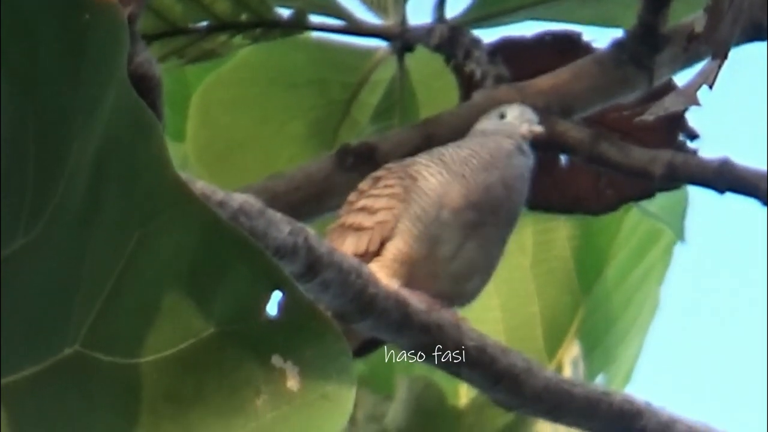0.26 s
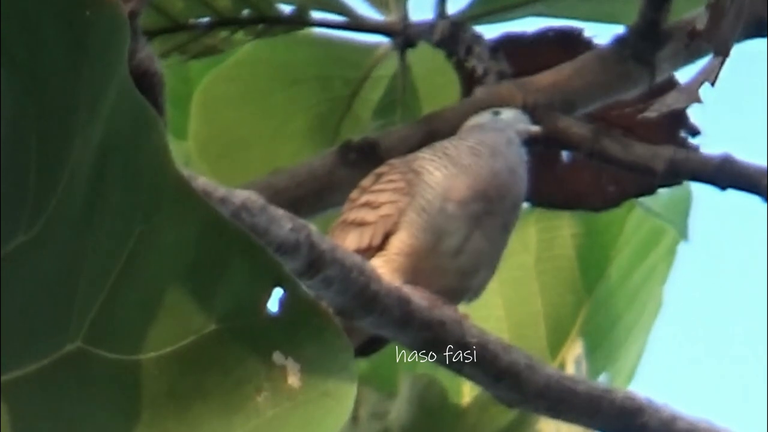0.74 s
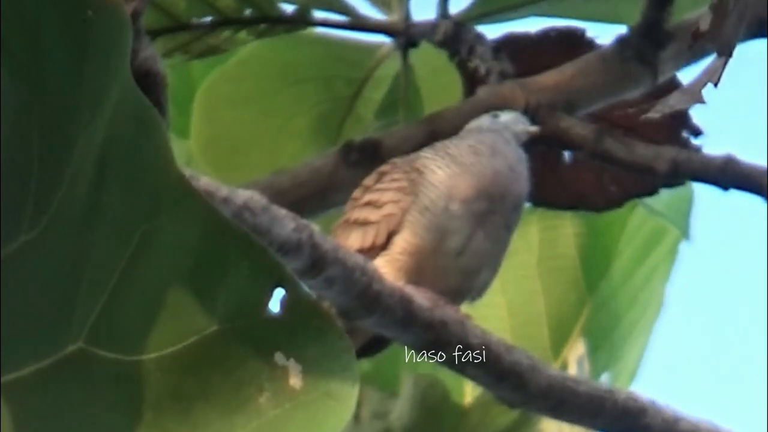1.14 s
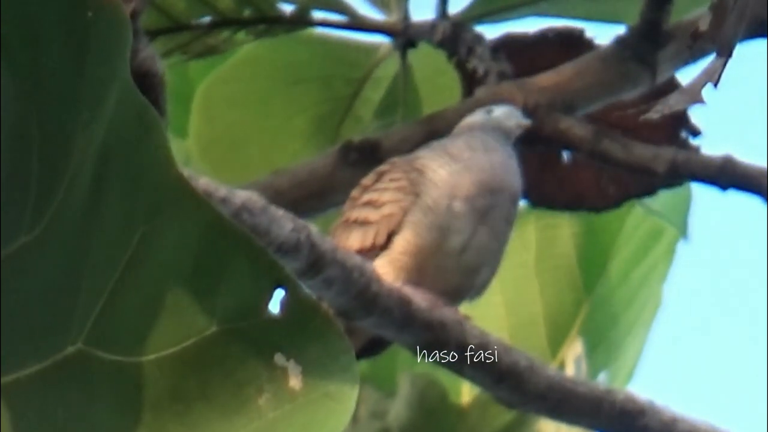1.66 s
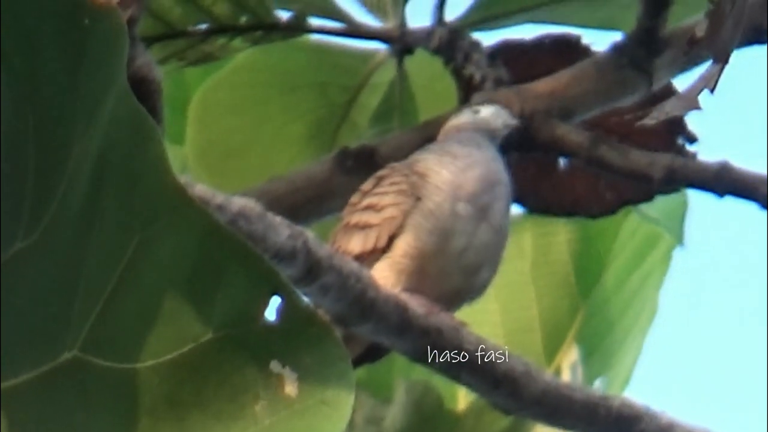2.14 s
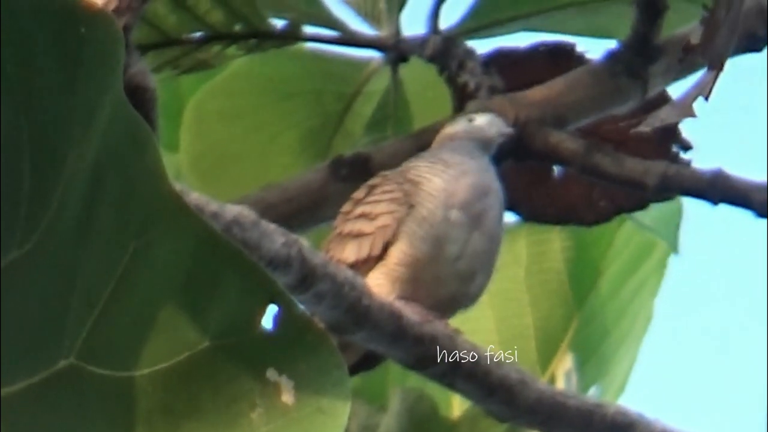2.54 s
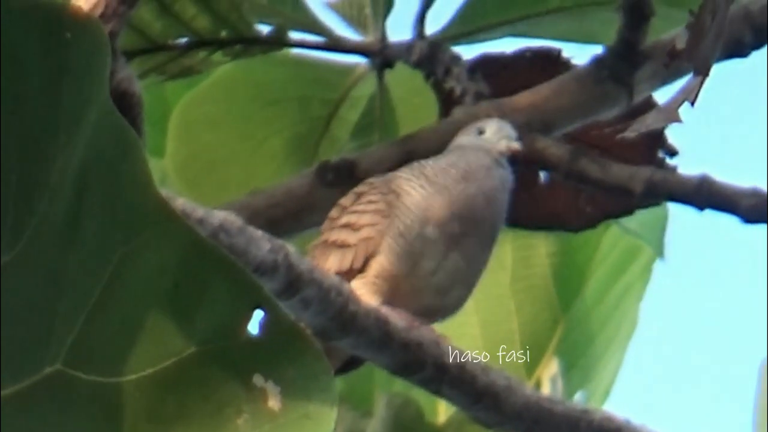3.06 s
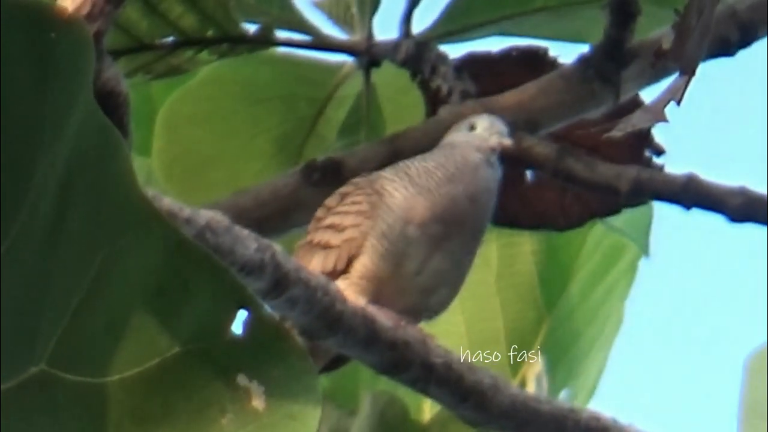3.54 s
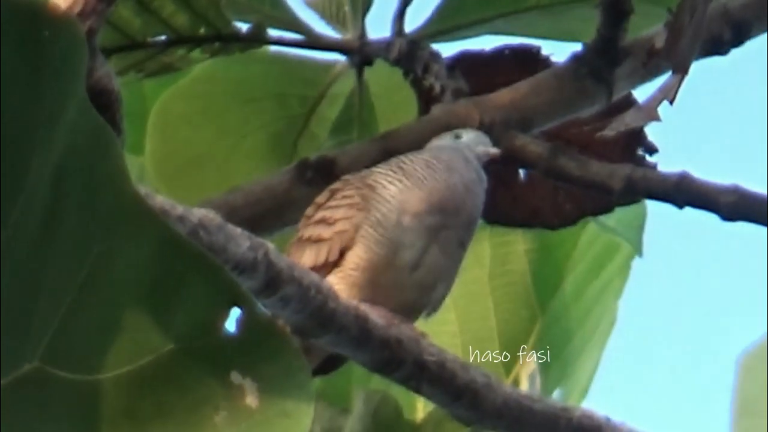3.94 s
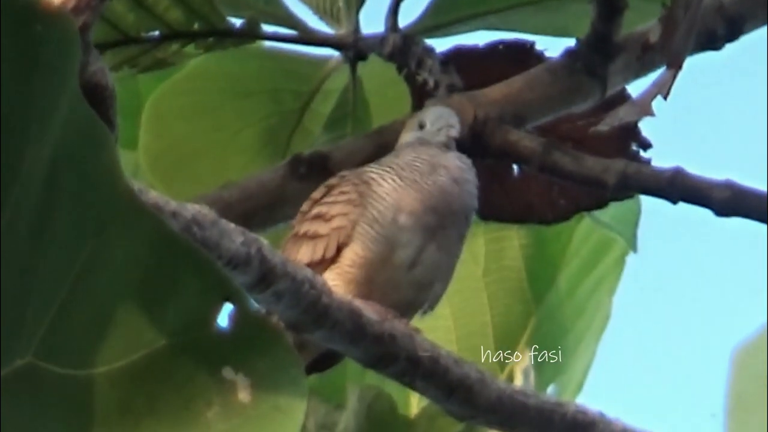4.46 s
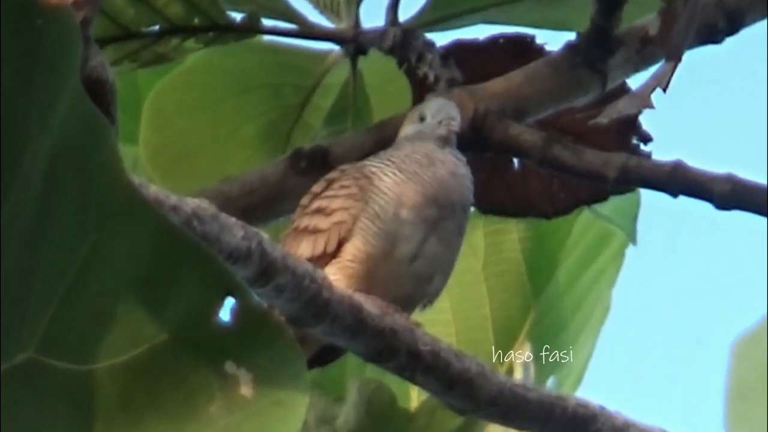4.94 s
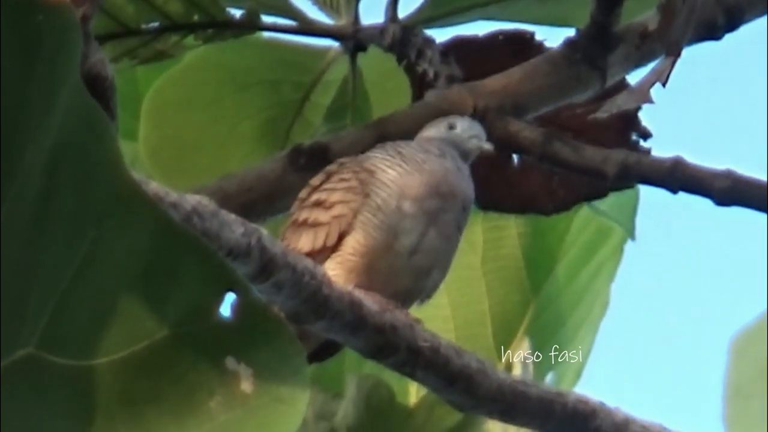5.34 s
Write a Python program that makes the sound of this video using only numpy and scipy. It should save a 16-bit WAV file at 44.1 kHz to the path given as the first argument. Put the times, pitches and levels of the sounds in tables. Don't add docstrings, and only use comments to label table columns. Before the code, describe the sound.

In a leafy grove, a zebra dove's bright rippling coo sounds and repeats, with far doves, thin whistles, small rasps and a steady insect drone.

```python
import sys
import numpy as np
from scipy import signal
from scipy.io import wavfile

SR = 44100
rng = np.random.default_rng(int(sys.argv[2]) if len(sys.argv) > 2 else 0)


def volts_from_db(level):
    exponent = np.asarray(level, float) / 20
    return 10 ** exponent


def waveform_to_disk(signal):
    frames = np.transpose(np.atleast_2d(signal))
    scaled = np.clip(frames, -1, 1) * 32767
    samples = np.round(scaled).astype(np.int16)
    wavfile.write(sys.argv[1], SR, samples)


N = 246959

# start_s, length_s, top_pitch_hz, level_db, gulp_length_s
COO = [
    (0.055, 0.19, 1292, -12.5, 0.024),
    (0.2605, 0.031, 1139, -11, 0.0099),
    (0.33, 0.042, 1152, -12.5, .013),
    (0.4254, 0.11, 1203, -13, 0.012),
    (0.6185, 0.11, 1234, -13, 0.014),
]
# start_s, level_db
PHRASES = [
    (0, 0),
    (3.0405, 0),
]
# at_s, depth (0-1 or more), closing_s, reopening_s
ROLL = [
    (.122, .5, .02, .004),
    (.163, .45, .025, .004),
    (.2025, 1.4, .006, .004),
]
# multiple of the pitch, level_db, lasting_s
OVERTONES = [(2, -37, 0.6), (3, -43.5, 0.15), (4, -44, .25), (5, -55, .1), (6, -32, 0.08), (10, -45, .06),
             (11, -47, .06)]
# delay_ms, level_db
ECHOES = [
    [(0, 0.0), (4.012, -19.1), (6.129, -11.3), (8.298, -16.4), (13.015, -21.8), (13.481, -18.3),
     (16.469, -15.5), (31.496, -22.4)],
    [(0, -1.6), (1.527, -17.1), (1.922, -21.0), (5.11, -8.7), (12.724, -24.2), (18.123, -17.3),
     (23.567, -21.9), (31.412, -21.1)],
]
# start_s, length_s, top_pitch_hz, level_db
FAR_DOVES = [(2.402, .21, 1304, -58.5), (2.629, .05, 1244, -56.5), (2.733, .095, 1288, -54),
             (2.924, 0.092, 1280, -52), (4.05, .24, 1193, -60.5), (4.28, 0.099, 1090, -63.5),
             (4.428, 0.07, 1140, -58), (5.152, .22, 1341, -53.5), (5.375, 0.051, 1260, -51),
             (5.462, 0.069, 1233, -53.5), (5.558, 0.15, 1293, -50)]
# start_s, length_s, first_pitch_hz, last_pitch_hz, level_db
LOW_DOVE = [
    (1.62, 0.26, 468, 466.7, -66.5),
    (2.08, 0.079, 482, 472, -66.5),
    (2.25, 0.39, 470, 458, -65),
    (2.68, .34, 458, 453.4, -61.5),
    (4.22, 0.17, 580, 555, -67),
]
# start_s after the beat, length_s, first_pitch_hz, last_pitch_hz, level_db
COUPLET = [
    (0, 0.1, 1144, 1316, -55.5),
    (0.099, .03, 1448, 1165, -57),
    (0.137, .06, 1296, 1310, -62),
]
# start_s, length_s, first_pitch_hz, last_pitch_hz, level_db
PIPING = [(.965, .06, 1150, 1160, -55), (1.81, .13, 2750, 2200, -65), (1.93, .12, 2200, 2180, -68),
          (2.2, .12, 3200, 2400, -57), (2.31, .18, 2400, 2340, -64), (2.42, .44, 3550, 3400, -68),
          (2.64, .22, 3200, 3000, -67), (3.97, .43, 4420, 4380, -70), (4.42, .16, 3900, 3750, -67)]
# start_s, length_s, settled_pitch_hz, sag_hz_per_s, level_db
WHISTLES = [
    (0.145, 0.12, 7480, 5900, -33.5),
    (2.341, .538, 7383, 940, -35),
    (5.23, 0.57, 7460, 1380, -38.5),
]
CATCHES = [
    2.757,
    5.478,
]
# start_s, length_s, first_pitch_hz, last_pitch_hz, level_db
CHIRPS = [
    (.985, 0.031, 6550, 4770, -39.5),
    (1.28, 0.027, 6300, 2500, -48),
    (2.455, 0.045, 6750, 5180, -39.5),
    (3.603, 0.048, 6930, 5300, -40),
    (4.433, 0.048, 6950, 5770, -40.5),
    (5.04, 0.038, 7940, 7300, -53.5),
]
# start_s, length_s, first_pitch_hz, last_pitch_hz, level_db
FAR_CHIRPS = [(1.059, 0.06, 3620, 2040, -59.5), (1.353, 0.056, 4010, 1925, -60),
              (1.653, 0.079, 3500, 1905, -60.5), (1.96, 0.032, 3280, 2680, -58),
              (2.037, 0.046, 3000, 3190, -59.5), (2.27, 0.042, 3500, 2690, -59),
              (2.573, .07, 3484, 2310, -61.5), (2.89, 0.057, 3595, 2290, -58),
              (3.208, 0.08, 3780, 2590, -60), (5.064, 0.029, 3300, 2270, -57.5),
              (5.407, 0.054, 3100, 2150, -58)]
# start_s, length_s, low_hz, high_hz, level_db
RASPS = [(0.384, .07, 6600, 8550, -51), (1.161, 0.049, 2860, 4300, -55.5),
         (1.321, 0.065, 2900, 7660, -50.5), (1.668, .06, 2800, 3680, -54.5),
         (2.064, 0.054, 2510, 5170, -48.5), (2.197, 0.065, 2540, 5400, -49.5),
         (2.42, 0.074, 2700, 5460, -47), (2.554, 0.068, 2700, 5530, -47), (3.736, 0.069, 2661, 5550, -45),
         (3.838, 0.047, 2820, 5497, -45.5), (4.52, 0.11, 6600, 8000, -51),
         (4.617, 0.063, 2615, 5800, -45.5), (4.739, 0.046, 2710, 5740, -45.5)]
# at_s, choir_level_db, air_gain_db
CHOIRS = [(0.0, -44, 6), (0.45, -43, 2), (0.9, -46, 1), (1.4, -45, -1), (1.75, -47.5, -2),
          (2.29, -49.5, -2), (2.501, -48.5, 0), (2.84, -49.5, -.5), (3.119, -48, 4.5), (3.87, -51, 1),
          (4.38, -51.5, -2), (5.6, -54, -1)]
# start_s, stop_s, first_pitch_hz, last_pitch_hz, level_db
BOUTS = [
    (-.4, 0.405, 6800, 6880, -48.5),
    (0.815, 1.735, 6750, 6900, -49.5),
    (1.948, 2.396, 6760, 6970, -72),
    (2.49, 3.108, 6640, 7067, -53.5),
    (3.098, 4.524, 6696, 6848, -53),
    (4.549, 5.335, 6300, 6650, -54.5),
    (5.3, 5.69, 6750, 6800, -52),
]
# band_hz, level_db
AIR = [(13, -42), (55, 3.1), (142, 0.5), (226, -8.5), (450, -11), (608, -11.5), (1080, -15), (2210, -20),
       (3070, -20.5), (5310, -24.5), (6260, -19.5), (7580, -39), (9700, -12.5), (11100, -30),
       (15500, -32.5)]
# band_hz, correlation (-1 to 1)
LIKENESS = [(60, 1.0), (180, 0.97), (550, 0.53), (1650, 0.36), (4970, 0.28), (15000, 0.72)]

GULP_FIRST_HZ, GULP_LAST_HZ, GULP_START_DB, GULP_TOP_DB, BREAK_S = 895, 1065, -15.5, 0, 0.0039
RISE, TOP_AT, SAG, SAG_POWER, RELEASE_S = 0.062, 0.22, 0.1347, 2.03, 0.0088
END_DROP, END_DROP_S = 0.055, .01
HOARSE_DB, PATCHY_DB = -33, 3.5
BRIGHT_HZ, BRIGHT_DB_PER_HZ = 1290, .05
PUFF_LEAD, PUFF_DB, PUFF_HZ = .62, -28, (620, 1400)
FAR_GULP_S, FAR_SAG = .011, .06
COUPLET_FIRST_S, COUPLET_EVERY_S = .895, .223
FLICK_HZ_PER_S, FLICK_S, SETTLE_HZ_PER_S, SETTLE_S = 1200, .015, 1200, 0.13
HOOK_HZ, HOOK_S, SWELL_DB, SWELL_SHARE, CATCH_S = 810, .018, -17, .3, 0.015
BOUT_SWELL_DB, BOUT_STOP_S, MIDDLE_REST_DB = -12, 0.0093, -59.5
HIGH_FIRST_DB, HIGH_DB, HIGH_SWELL_S = -62, -55.5, 1.7
GROVE_T60_S, GROVE_DB, AIR_DB = 0.41, -19, -48


def dove():
    notes = [coo_note(*row, SAG) for row in COO]
    bright = [note + np.outer(note[:, 1] - BRIGHT_HZ, [0, 0, BRIGHT_DB_PER_HZ]) for note in notes]
    plain = sing(notes, [], 0.003)
    overtones = sing(bright, OVERTONES, .005) - sing(bright, [], .005)
    once = np.array([plain, overtones])
    both = np.zeros((2, N))
    for start_s, level_db in PHRASES:
        add(both, volts_from_db(level_db) * once, start_s)
    wobble = rms_one(band_pass(3, 60, 380, rng.standard_normal(N)))
    coo = both[0] * (1 + volts_from_db(HOARSE_DB) * wobble)
    coo = coo + both[1] * volts_from_db(PATCHY_DB * drift(19)) + puffs()
    n = np.arange(N)
    ports = [sum(volts_from_db(db) * np.interp(n - ms * SR / 1e3, n, coo) for ms, db in paths) for paths in ECHOES]
    return np.array(ports) + grove(coo, GROVE_DB)


def coo_note(start_s, length_s, top_hz, level_db, gulp_s, sag):
    t = np.arange(0, length_s, 1e-3)
    u = np.clip((t - gulp_s) / (length_s - gulp_s), 0, 1)
    climbing = RISE * (1 - u / TOP_AT) ** 2
    sagging = sag * (np.abs(u - TOP_AT) / (1 - TOP_AT)) ** SAG_POWER
    arch = np.where(u < TOP_AT, climbing, sagging)
    slip = END_DROP * np.exp((t - length_s) / END_DROP_S)
    upper = np.clip((t - gulp_s) / BREAK_S + .5, 0, 1)
    gulp_hz = np.interp(t, [0, gulp_s], [GULP_FIRST_HZ, GULP_LAST_HZ])
    hz = (1 - upper) * gulp_hz + upper * top_hz * (1 - arch - slip)
    opening = np.interp(t, [0, 0.77 * gulp_s], volts_from_db([GULP_START_DB, GULP_TOP_DB]))
    gain = np.where(t < gulp_s, opening, 1) * np.clip((length_s - t) / RELEASE_S, .03, 1)
    now = start_s + t
    for at, depth, closing, reopening in ROLL:
        away = np.where(now < at, (at - now) / closing, (now - at) / reopening)
        gain = gain * (1 - np.minimum(.98, depth * np.exp(-away)))
    return np.transpose([now, hz, level_db + 20 * np.log10(gain)])


def puffs():
    out = np.zeros(N)
    for later_s, _ in PHRASES:
        for start_s, _, _, _, gulp_s in COO:
            n = int((PUFF_LEAD * gulp_s + .005) * SR)
            noise = rms_one(band_pass(5, *PUFF_HZ, rng.standard_normal(2000))[-n:])
            swell = np.sin(np.pi * np.arange(n) / n) ** .5
            level = volts_from_db(PUFF_DB) * gulp_s / COO[0][4]
            add(out, level * noise * swell, later_s + start_s - PUFF_LEAD * gulp_s)
    return out


def sing(notes, overtones, fade_s):
    out = np.zeros(N)
    for note in notes:
        s, hz, db = np.transpose(note)
        t = np.arange(s[0], s[-1], 1 / SR)
        phase = 2 * np.pi * np.cumsum(np.interp(t, s, hz)) / SR
        tone = np.sin(phase)
        for multiple, level_db, lasting_s in overtones:
            tone = tone + volts_from_db(level_db) * np.exp((s[0] - t) / lasting_s) * np.sin(multiple * phase)
        edge = np.clip(np.minimum(t - s[0], s[-1] - t) / fade_s, 0, 1)
        add(out, np.sqrt(2) * np.interp(t, s, volts_from_db(db)) * edge * tone, s[0])
    return out


def far_birds():
    beats = COUPLET_FIRST_S + (np.arange(6) - 1) * COUPLET_EVERY_S
    couplets = [(beat + s, *rest) for beat in beats for s, *rest in COUPLET]
    notes = [coo_note(*row, FAR_GULP_S, FAR_SAG) for row in FAR_DOVES]
    notes = notes + [glide(*row) for row in [*couplets, *LOW_DOVE]]
    doves = sing(notes, [], 0.0062) * volts_from_db(3.75 * drift(35))
    doves = doves + sing([glide(*row) for row in PIPING], [], .02) * drift(45)
    whistles = sing([whistle(*row) for row in WHISTLES], [(2.3, -41.5, 2.6)], 0.007)
    whistles = whistles * volts_from_db(2 * drift(44))
    return pan(doves, -10.0) + grove(doves, 1.1) + pan(whistles, .6) + grove(whistles, -7.5)


def glide(start_s, length_s, first_hz, last_hz, level_db):
    t = np.arange(0, length_s, 5e-3)
    hz = last_hz + (first_hz - last_hz) * (1 - t / length_s) ** 2.9
    return np.transpose([start_s + t, hz, level_db + 0 * t])


def whistle(start_s, length_s, hz, sag, level_db):
    t = np.arange(0, length_s, 2e-3)
    opening = FLICK_HZ_PER_S * np.exp(-t / FLICK_S) + SETTLE_HZ_PER_S * np.exp(-t / SETTLE_S)
    hook = HOOK_HZ * np.exp((t - length_s) / HOOK_S)
    pitch = hz - sag * t + length_s * opening - hook
    ends = np.exp(-t / (SWELL_SHARE * length_s)) + np.exp((t - length_s) / 0.015)
    catches = sum(22 * np.exp(-((start_s + t - at) / CATCH_S) ** 4) for at in CATCHES)
    return np.transpose([start_s + t, pitch, level_db + SWELL_DB * ends - catches])


def chirps(rows, lead_db, wet_db, flutter_db, bend):
    out = np.zeros(N)
    for start_s, length_s, first_hz, last_hz, level_db in rows:
        u = np.arange(0, 1, 1 / (length_s * SR))
        hz = first_hz * (last_hz / first_hz) ** (u ** bend)
        tone = np.sin(2 * np.pi * np.cumsum(hz) / SR)
        add(out, volts_from_db(level_db + 2.5) * np.sin(np.pi * u) ** 0.32 * tone, start_s)
    out = out * volts_from_db(flutter_db * drift(70))
    return pan(out, lead_db) + grove(out, wet_db)


def rasps():
    out = np.zeros((2, N))
    for start_s, length_s, low_hz, high_hz, level_db in RASPS:
        t = np.arange(round(length_s * SR)) / SR
        noise = rng.standard_normal(len(t)) + 0.21 * rng.standard_normal((2, len(t)))
        chop = 0.31 + np.cos(np.pi * 120 * t) ** 2
        wide = band_pass(3, low_hz, high_hz, noise)
        throat = band_pass(1, 1.2 * low_hz, 1.3 * low_hz, wide)
        under = band_pass(2, low_hz / 2, 2 * low_hz / 3, noise)
        rasp = rms_one(wide + 1.1 * throat) + 1.5 * under
        add(out, volts_from_db(level_db) * rasp * chop * np.sin(np.pi * t / length_s) ** 0.36, start_s)
    return out + grove(out[1], -5.0)


def insects():
    t = np.arange(N) / SR
    at_s, low_db, _ = np.transpose(CHOIRS)
    high_db = HIGH_DB + (HIGH_FIRST_DB - HIGH_DB) * np.exp(-t / HIGH_SWELL_S)
    middle, middle_hz = bouts()
    out = volts_from_db(np.interp(t, at_s, low_db)) * choir(6188, 560, [(55, 0.32), (82, 0.2)], apart=0.61)
    out = out + middle * choir(middle_hz, 550, [(152, 0.37)], apart=0.26)
    out = out + volts_from_db(high_db) * choir(9506, 1500, [(122.2, 0.23), (244.4, .15)], apart=0.14)
    return out + volts_from_db(-65) * choir(3200, 800, [(40, .3)], apart=0.39)


def choir(hz, width_hz, beats, apart):
    t = np.arange(N) / SR
    noise = rng.standard_normal((2, N)) + 1j * rng.standard_normal((2, N))
    mid, side = signal.sosfilt(signal.butter(3, width_hz / 2, fs=SR, output="sos"), noise)
    throb = 1
    for rate, depth in beats:
        turns = np.cumsum(rate * (1 + .01 * drift(1.64))) / SR
        throb = throb * (1 + depth * np.cos(2 * np.pi * turns))
    carrier = np.exp(2j * np.pi * np.cumsum(hz + 0 * t) / SR)
    ring = (mid + apart * side * [[1], [-1]]) * carrier
    return rms_one(ring.real * throb)


def bouts():
    t = np.arange(N) / SR
    gain, hz = volts_from_db(MIDDLE_REST_DB) + 0 * t, BOUTS[0][2] + 0 * t
    for start_s, stop_s, first_hz, last_hz, level_db in BOUTS:
        u = np.clip((t - start_s) / (stop_s - start_s), 0, 1)
        edges = np.clip(np.minimum(u / .15, (stop_s - t) / BOUT_STOP_S), 0, 1)
        gain = gain + volts_from_db(level_db + BOUT_SWELL_DB * (1 - u) ** 2.8) * edges
        hz = np.where(t > start_s, first_hz + (last_hz - first_hz) * u, hz)
    return gain, hz


def air():
    out, edges = 0, 20 * 2 ** np.arange(0, 9.8, .5)
    white = rng.standard_normal((2, 2, N))
    for k, (low, high) in enumerate(zip(edges, edges[1:])):
        mid, side = band_pass(2, low, high, white[k % 2])
        hz = np.sqrt(low * high)
        alike = np.clip(at_hz(LIKENESS, hz), -1, 1)
        stereo = np.sqrt(1 + alike) * mid + np.sqrt(1 - alike) * side * [[1], [-1]]
        out = out + volts_from_db(at_hz(AIR, hz) + 1.46 * drift(6.9)) * stereo
    at_s, _, gain_db = np.transpose(CHOIRS)
    breeze = volts_from_db(np.interp(np.arange(N) / SR, at_s, gain_db))
    return breeze * volts_from_db(AIR_DB) * rms_one(out)


def grove(x, wet_db):
    t = np.arange(SR // 2) / SR
    tail = rng.standard_normal((2, len(t))) * volts_from_db(-60 * t / GROVE_T60_S) * (t > .02)
    tail = tail / np.linalg.norm(tail[0])
    return volts_from_db(wet_db) * signal.fftconvolve(x[None], tail, axes=1)[:, :N]


def rms_one(x):
    return x / np.sqrt(np.mean(np.abs(x) ** 2) + 1e-20)


def band_pass(order, low_hz, high_hz, x):
    return signal.sosfilt(signal.butter(order, [low_hz, high_hz], "band", fs=SR, output="sos"), x)


def at_hz(points, hz):
    point_hz, value = np.transpose(points)
    return np.interp(np.log(hz), np.log(point_hz), value)


def drift(rate):
    r = np.exp(-80 * np.pi * rate / SR)
    slow = signal.lfilter([1], [1, -2 * r, r * r], rng.standard_normal(N // 40 + 2002))[2000:]
    return np.interp(np.arange(N) / 40, np.arange(len(slow)), rms_one(slow))


def pan(x, lead_db):
    return x * volts_from_db([[lead_db / 2], [-lead_db / 2]])


def add(out, x, start_s):
    i = round(start_s * SR)
    out[..., i:i + x.shape[-1]] += x[..., :N - i]


def scene():
    near_chirps = chirps(CHIRPS, -1.7, -11.5, flutter_db=0.5, bend=1.8)
    far_chirps = chirps(FAR_CHIRPS, -16, 1.4, flutter_db=3.0, bend=1.1)
    return dove() + far_birds() + near_chirps + far_chirps + rasps() + insects() + air()


def roll_off(x):
    return signal.sosfilt(signal.butter(12, 15620, fs=SR, output="sos"), x)


def record(dry):
    return roll_off(dry)


dry = scene()
out = record(dry)
waveform_to_disk(out)
```